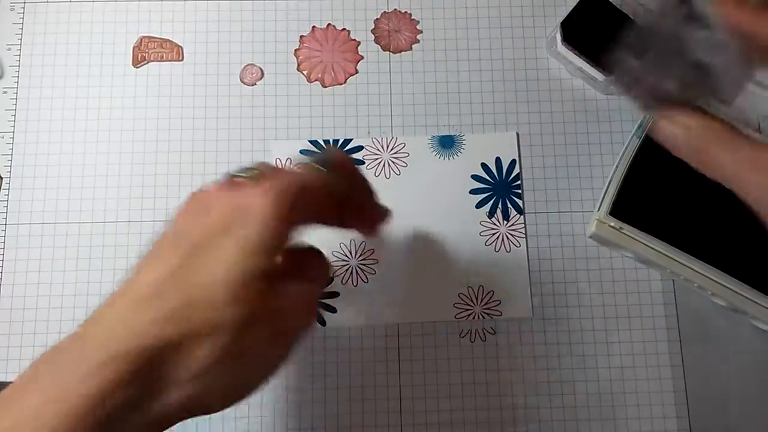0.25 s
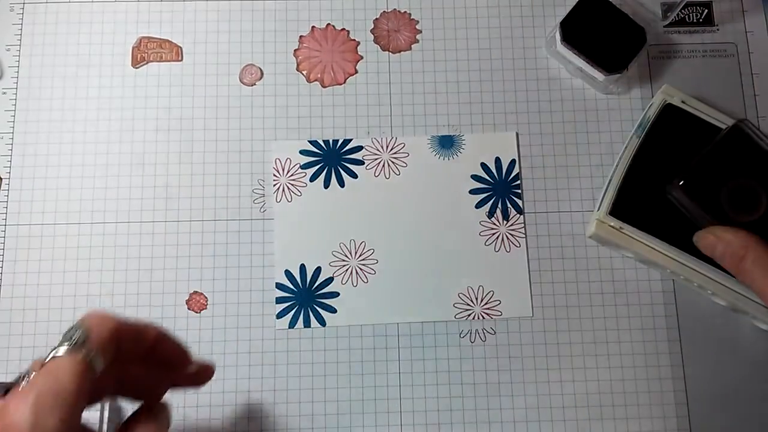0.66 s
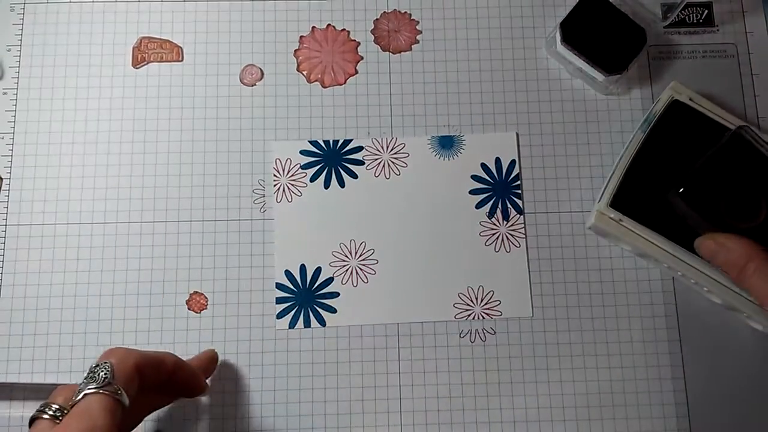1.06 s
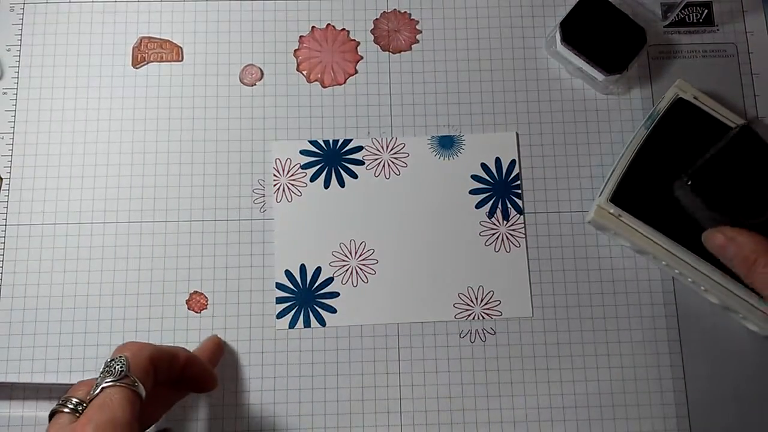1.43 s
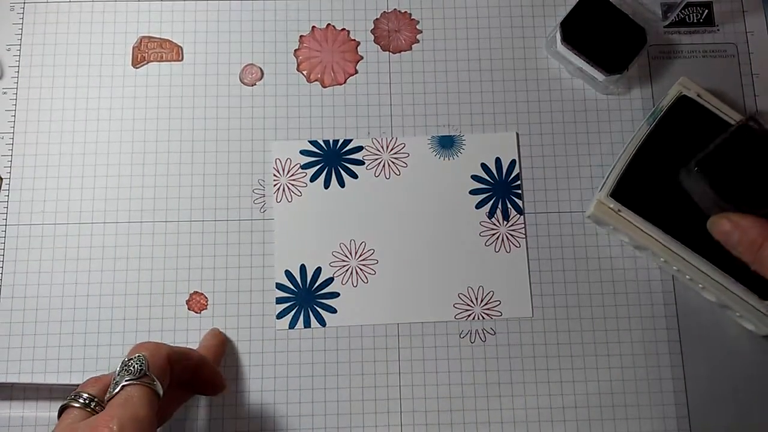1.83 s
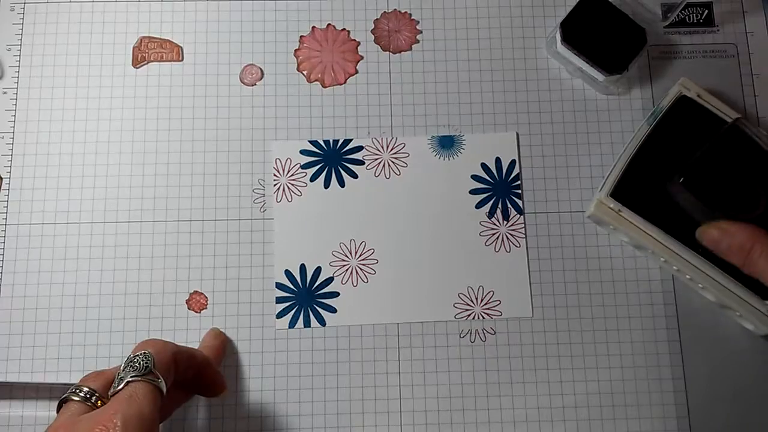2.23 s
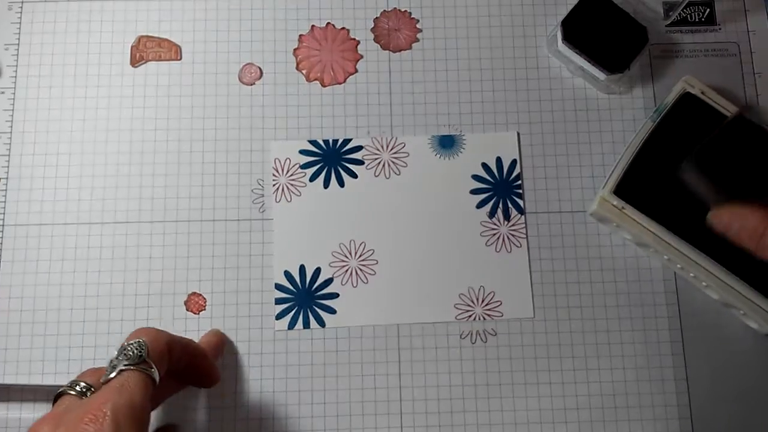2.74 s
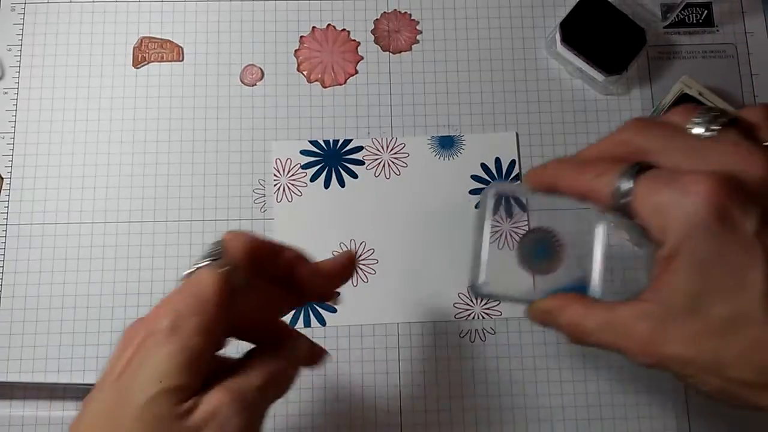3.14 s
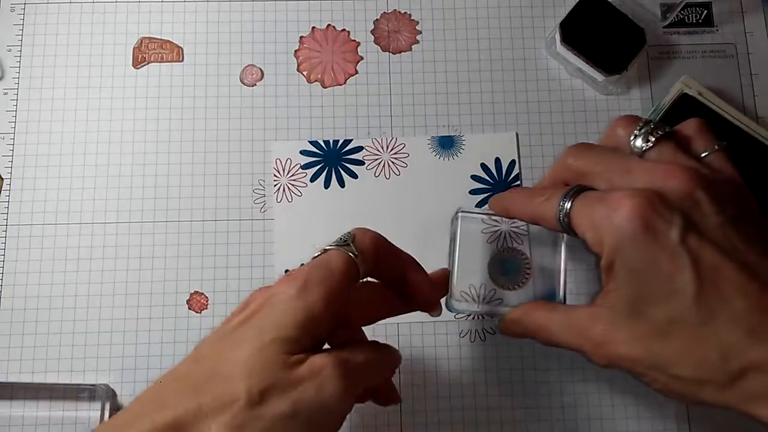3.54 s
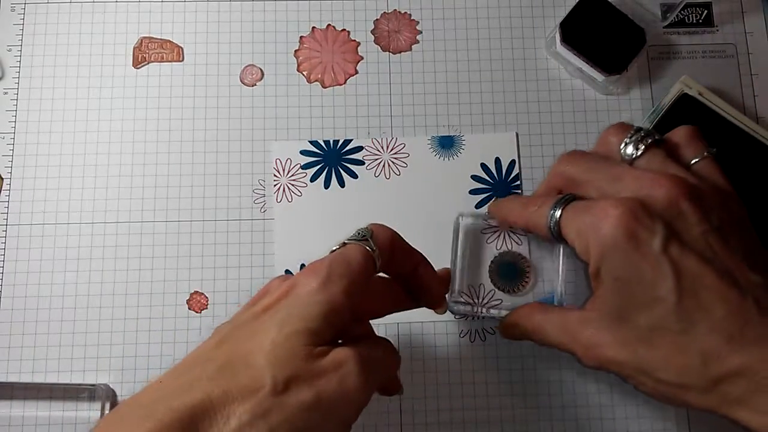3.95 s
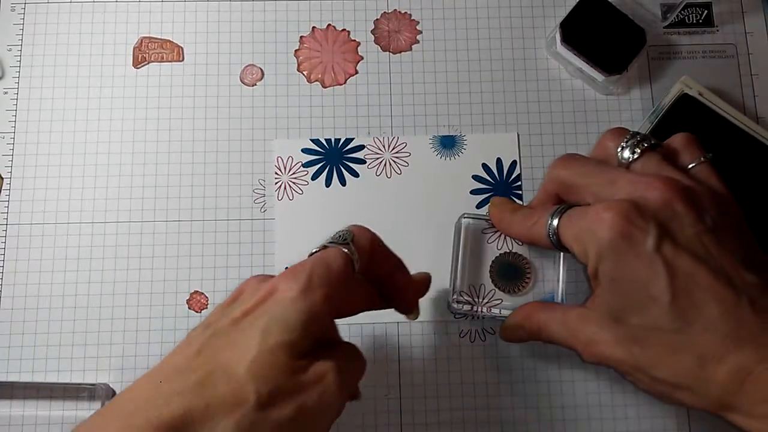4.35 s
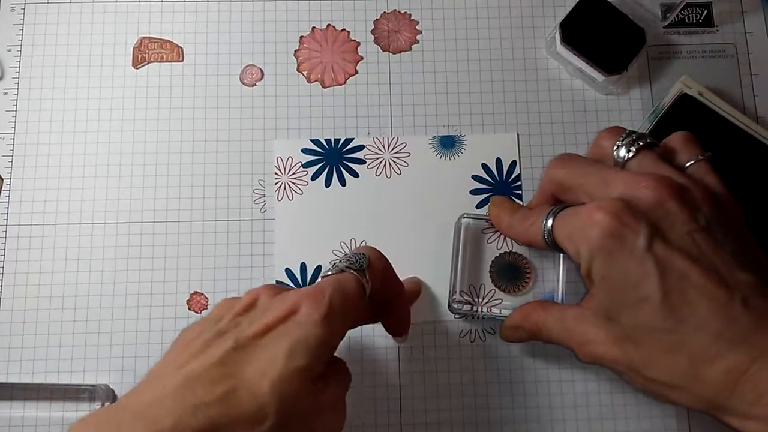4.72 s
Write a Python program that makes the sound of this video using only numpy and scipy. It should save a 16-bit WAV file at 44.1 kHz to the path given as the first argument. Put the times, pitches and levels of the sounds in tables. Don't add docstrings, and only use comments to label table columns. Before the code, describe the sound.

Faint ticks come first, then five evenly spaced hollow plastic taps with woody desk thumps. Between them the block peels from the sticky pad with little creaks and loose rattles, the early rattles brightest and loudest. A pause follows, then a single soft thud on card and tiny late ticks. Close desk microphone, short dry room, low mains hum and hiss that swells with the blows.

```python
import sys
import numpy as np
from scipy import signal
from scipy.fft import rfft, irfft
from scipy.io import wavfile
from scipy.ndimage import uniform_filter1d

SR = 44100
rng = np.random.default_rng(int(sys.argv[2]) if len(sys.argv) > 2 else 0)


def boost(x):
    u = np.asarray(x, float) / 20
    return 10 ** u


def master(y):
    cut = np.clip(np.atleast_2d(y).T, -1, 1)
    pcm = np.round(cut * 32767)
    wavfile.write(sys.argv[1], SR, pcm.astype(np.int16))


N = 219744
TIME = np.arange(N) / SR


def colour(x, table):
    hz, db = np.transpose(table)
    f = np.maximum(np.arange(len(x) // 2 + 1) * SR / len(x), 1)
    gain_db = np.interp(np.log(f), np.log(hz), db)
    return irfft(rfft(x) * boost(gain_db), len(x))


def add(out, start_s, x, peak_db):
    i = int(start_s * SR)
    n = min(len(x), N - i)
    out[i:i + n] += x[:n] * boost(peak_db) / np.abs(x).max()


def decay(t, t60):
    return np.exp(-np.log(1000) * t / t60)


def ring(modes, extra_db, detune, size):
    hz, db, t60 = np.transpose(modes)[:, :, None]
    t = np.arange(size) / SR
    return np.sum(boost(db + extra_db) * np.sin(2 * np.pi * hz * detune * t) * decay(t, t60), axis=0)


def push(ms):
    n = max(int(ms * SR / 1000), 2)
    return np.sin(np.pi * (np.arange(n) + .5) / n)


# start_s, case_db, knock_db, desk_top_db, frame_db
TAPS = [
    (0.585, -37.5, -30.5, -34, -31.5),
    (1.0266, -24.5, -33.5, -37.5, -31),
    (1.494, -25.5, -27.5, -36.5, -32),
    (1.991, -26.5, -24.5, -36.5, -33),
    (2.4786, -22, -22.5, -36.5, -34),
]
# delay_s, under_tap_db, crack_db, favour_db
REBOUNDS = [
    (.011, -18, -30, 18),
    (.033, -26.5, -22, 21.5),
]
# start_s, case_db, pitch_hz, creak_db, knock_db
SCUFFS = [
    (0.764, -60.5, 940, -53, -50.5),
    (1.222, -47.5, 1851, -60.5, -42.5),
    (1.677, -50, 1100, -61, -53),
    (2.224, -51, 1082, -57, -42),
    (2.696, -61, 920, -60, -62),
]
# start_s, creak_db, length_ms, pitch_hz, knock_db
CLINGS = [
    (0.842, -45.5, 44, 1218, -49),
    (1.285, -39, 39, 1105, -45.5),
    (1.76, -56.5, 22, 1263, -56),
    (2.261, -46, 13, 1190, -64),
    (2.739, -43, 18, 1110, -55.5),
]
# start_s, peak_db, crack_under_peak_db, favoured_pitch_hz, favour_db
CLATTER = [(0.862, -34, -23.5, 1300, 1.5), (0.8747, -15, -35, 1881, 34), (0.8809, -5, -8, 2525, 15),
           (0.887, -4, -7.5, 1420, 8), (0.898, -16.5, -7.5, 1710, 7.5), (0.907, -11, -20, 1450, 2.5),
           (1.309, -15, -25.5, 1150, 6), (1.317, -18.5, -17.5, 1900, 7), (1.328, -3.5, -7.5, 3300, 1),
           (1.332, -8.5, -8.5, 1120, 6.5), (1.3445, -3.5, -15.5, 1140, 8), (1.353, -20, -10, 1680, 9.5),
           (1.779, -31, -40, 1070, 2), (1.785, -22, -20, 1706, 5), (1.7897, -27, -24, 1044, 12),
           (2.276, -40, -53, 1010, 22), (2.2872, -15.5, -41, 1760, 5), (2.2933, -7, -15, 1190, 7),
           (2.301, -15, -20, 1640, -1.5), (2.308, -24, -5.5, 1710, -0.5), (2.754, -29.5, -19, 1003, 7),
           (2.7655, -12, -12.5, 1700, 18), (2.771, -14.5, -18.5, 1130, -1), (2.781, -23, -21, 1670, 9)]
# start_s, peak_db, crack_over_peak_db, pitch_hz, knock_db
STRAYS = [
    (0, -55.5, 23.5, 2660, -80),
    (0.05, -55, 8, 2730, -58),
    (0.205, -78.5, 14.5, 990, -76),
    (2.128, -60.5, 5, 1260, -72.5),
    (3.991, -45.5, 5, 750, -72),
    (4.001, -42.5, -7.5, 750, -68),
    (4.4, -74, 13, 790, -88),
    (4.895, -59.5, 1, 1330, -61),
    (4.91, -65, -2, 3350, -70),
]


def contacts():
    rows = []
    for s, db, crack_db, hz, favour_db in CLATTER:
        chatter_ms = 1.9 - 0.2871 * db
        rows.append((s, db, crack_db, hz, chatter_ms, favour_db))
    tap_hz, tap_ms = 1070, 3.8
    for s, db, knock_db, *_ in TAPS:
        tap_favour_db = 21 + 1.4 * (knock_db + 26)
        rows.append((s, db, -39.5, tap_hz, tap_ms, tap_favour_db))
        for late_s, under_db, crack_db, favour_db in REBOUNDS:
            rows.append((s + late_s, db + under_db, crack_db, tap_hz, tap_ms, favour_db))
    for s, db, hz, *_ in SCUFFS:
        rows.append((s, db, -14.5, hz, 2.4, 8.5))
    for s, db, _, hz, _ in CLINGS:
        for late_s, over_db in ((-.006, -4), (0, 1)):
            rows.append((s + late_s, db + over_db, -19.5, hz, 4.5, 10.5))
    for s, db, crack_db, hz, _ in STRAYS:
        rows.append((s, db, crack_db, hz, 6.6, 5))
    return rows


# pitch_hz, level_db, t60_s
CASE = [(947, -11, 0.051), (1058, -1.5, 0.018), (1150, 2, 0.03), (1300, -3.5, 0.02), (1420, -6, 0.04),
        (1686.6, 2.5, 0.028), (1840, -0.5, 0.026), (2014, -4.5, 0.02138), (2406, -6.5, .03),
        (2445, -7, 0.052), (2870, -8.5, .025), (3017, -10, 0.035), (3180, -6.5, 0.02), (3386, -4, 0.032),
        (3810, -13, 0.032), (4440, -19, 0.018), (4760, -17, 0.012)]
# pitch_hz, level_db
WALLS = [(500, -17), (800, -13.5), (1150, 4), (1700, -6), (2600, -0.5), (3500, -12), (5000, -8),
         (7000, -29)]
# pitch_hz, level_db
CRACK = [(2500, -10.5), (4000, 6), (6000, -3), (9600, -2), (10900, -17.5), (16000, -34)]
# pitch_hz, level_db
TICK = [(7000, -20.5), (10000, 0), (13000, -3), (16000, -17)]


def case():
    rung, rough, t = np.zeros(N), np.zeros(N), np.arange(4096) / SR
    mode_hz = np.array(CASE)[:, :1]
    for s, db, crack_db, favour_hz, ms, favour_db in contacts():
        chance = rng.standard_normal((2, len(CASE), 1))
        grit = rng.standard_normal((4, 4096))
        fade = np.exp(-t * 1000 / max(ms, .2)) * np.minimum(t / 0.0011, 1)
        chatter = .12 * grit[0] * boost(4.2 * grit[1]) * fade + (t == 0)
        soft_db = 0.2 * np.clip(-6.0 - crack_db, 0, 36)
        nearness = np.exp(-(np.log(mode_hz / favour_hz) / 0.091) ** 2)
        lean_db = 2 * chance[0] + favour_db * nearness
        lean_db = lean_db - soft_db * np.maximum(np.log2(mode_hz / 1500), 0)
        modes = ring(CASE, lean_db, 1 + 0.011 * chance[1], size=4096)
        add(rung, s, signal.fftconvolve(chatter, modes), db)
        rush = colour(colour(grit[3], WALLS), [(1500, 0.0052), (12000, -3 * soft_db)])
        rush = rush * np.minimum(t / 0.0015, 1) * np.exp(-t / 0.0055)
        add(rough, s, rush, db - 3.5 - 0.28 * favour_db)
        crack = colour(colour(grit[2], CRACK), [(5000, 0.0019), (16000, -.8 * soft_db)])
        add(rough, s, crack * fade * np.exp(-t / .006), db + crack_db)
        tick = colour(grit[1], TICK) * fade * np.exp(-t / .0012)
        add(rough, s, tick, db + crack_db - 16.5 - soft_db)
    return rung, rough


# start_s, knock_db, desk_top_db, frame_db
DROPS = [
    (0.8737, -30, -30, -41.5),
    (0.8855, -15.5, -68, -43),
    (1.31, -27.5, -32, -40.5),
    (1.3279, -13.5, -28, -36.5),
    (1.3445, -22.5, -34.5, -43),
    (1.785, -28, -34.5, -60),
    (2.2849, -32.5, -31.5, -45),
    (2.7505, -43.5, -44, -55),
    (2.7655, -20.5, -32, -43),
    (3.992, -19, -30, -34),
]


def blows():
    rows = list(DROPS)
    for s, _, *desk_db in TAPS:
        rows.append((s, *desk_db))
    for row in SCUFFS + CLINGS + STRAYS:
        knock_db = row[-1]
        rows.append((row[0] + 0.00067, knock_db, knock_db - 17, knock_db - 7.5))
    return rows


# pitch_hz, level_db, t60_s
HOLLOW = [(194, -16.5, 0.04), (279, -7.5, 0.098), (325, 0.5, 0.1), (359, 0, 0.084), (397.6, 2.5, 0.067),
          (378, -10, .06), (630, 5, 0.0095), (640, -10.5, 0.12)]
# pitch_hz, level_db, t60_s
CARD = [(196, -20.5, 0.13), (272.6, -0.5, 0.067), (311, 2, 0.046), (406, -18, 0.069), (531.5, -10.5, 0.079),
        (617, -7.5, 0.061), (747, -21, 0.077)]
# pitch_hz, level_db, t60_s
DESK = [(120.9, 8.5, .22), (143, -19.5, 0.07)]
# pitch_hz, level_db, t60_s
FRAME = [(59.2, -3, 0.37), (79, -7, 0.21)]
PRESS_S = 3.992


def desk():
    out, t = np.zeros(N), np.arange(8192) / SR
    swing = 1 - np.exp(-np.arange(16384) / SR / 0.0008)
    for s, knock_db, top_db, frame_db in blows():
        pressed = abs(s - PRESS_S) < .02
        modes, build_s, push_ms = (CARD, .004, .8) if pressed else (HOLLOW, .0015, 1.2)
        chance = rng.standard_normal((2, len(modes), 1))
        knock = ring(modes, 3.3 * chance[0], 1 + 0.013 * chance[1], size=8192)
        knock = knock * (1 - np.exp(-t / build_s))
        add(out, s, signal.fftconvolve(knock, push(push_ms)), knock_db)
        add(out, s + 0.00077, swing * ring(DESK, 0, 0.99, size=16384), top_db)
        add(out, s + 0.0039, swing * ring(FRAME, 0, 0.99, size=16384), frame_db)
    return out


# delay_s, length_ms, pitch_hz, level_db, overtone_db
SHIVERS = [
    (.0095, 6.5, 2385, -50.5, -30),
    (.027, 19, 1024, -49, -20),
]
# delay_s, length_ms, pitch_hz, under_knock_db, overtone_db
RING = (.0005, 7, 1035, -8, -30)
# start_s, length_ms, pitch_hz, level_db, overtone_db
SETTLE = [
    (1.374, 12, 1019, -37, -33),
]


def strains():
    rows, shiver_rough = [], 0.29
    ring_late_s, ring_ms, ring_hz, under_db, ring_over_db = RING
    for s, tap_db, knock_db, *_ in TAPS:
        for late_s, ms, hz, db, over_db in SHIVERS:
            rows.append((s + late_s, ms, hz, db + tap_db + 22.5, over_db, shiver_rough))
        rows.append((s + ring_late_s, ring_ms, ring_hz, knock_db + under_db, ring_over_db, shiver_rough))
    for s, db, ms, hz, _ in CLINGS:
        rows.append((s, ms, hz, db, -14, .8))
    for s, _, hz, db, _ in SCUFFS:
        rows.append((s - .002, 14, hz, db, -16, 0.74))
    for row in SETTLE:
        rows.append((*row, shiver_rough))
    return rows


def creaks():
    out, t = np.zeros(N), np.arange(2048) / SR
    for s, ms, hz, db, over_db, rough in strains():
        drift = uniform_filter1d(rng.standard_normal((3, 2048)), 90, axis=1) * 6.0
        phase = 2 * np.pi * np.cumsum(hz * (1 + .12 * rough * drift[0])) / SR
        swell = np.minimum(t / .002, 1) * np.exp(-np.maximum(t - ms / 1000, 0) / 0.0036)
        tone = boost(4.0 * rough * drift[1]) * np.sin(phase)
        overtone = boost(over_db + 14 * rough * drift[2]) * np.sin(2.15 * phase)
        add(out, s, swell * (tone + overtone), db)
    return out


# pitch_hz, level_db, t60_s
ROOM = [(150, -13.5, 0.39), (397, -14, 0.19), (770, -25, 0.2), (1819.4, -23.5, 0.17), (3975, -24, .18),
        (8000, -21.5, 0.12)]


def room(x):
    t, tail = np.arange(16384) / SR, 0
    for hz, db, t60 in ROOM:
        octave = [(hz / 3, -30), (hz / 1.3, 0), (hz * 1.3, 0), (hz * 3, -30)]
        band = colour(rng.standard_normal(len(t)), octave)
        tail = tail + boost(db) * band / band.std() * decay(t, t60) * np.sqrt(hz / 1000)
    tail = signal.sosfilt(signal.butter(4, 170, "high", fs=SR, output="sos"), tail)
    return signal.fftconvolve(x, 0.036 * tail * np.minimum(t / 0.0031, 1))[:N]


# start_s, end_s, first_opening_db, last_opening_db
GATE_OPEN = [
    (0, .09, 13.5, 6),
    (.09, 0.187, 2.5, 6),
    (.6, 2.205, 7.5, 10),
    (2.28, 2.6, 6.5, 10),
    (2.75, 2.95, 10, 9),
    (3.99, 4.22, 10.5, 6.5),
]


def gate():
    slew_s, ajar_db, shuts_s = .022, 1.5, .25
    open_db = np.zeros(N)
    for start, end, first_db, last_db in GATE_OPEN:
        sliding = np.interp(TIME, [start, end], [first_db, last_db])
        closing = ajar_db * np.exp(-np.maximum(TIME - end, 0) / shuts_s)
        since_start = np.where(TIME < end, sliding, closing)
        open_db = np.where(TIME < start, open_db, since_start)
    return uniform_filter1d(open_db, int(slew_s * SR), mode="nearest")


# pitch_hz, level_db (per Hz)
AIR = [(15, -49), (25, -26), (45, -7), (75, -8.5), (105, -19.5), (200, -23.5), (1000, -33.5),
       (16000, -40.5)]
# pitch_hz, level_db
HUM = [(59.2, -69.5), (177.6, -82.5), (296.1, -90), (414.5, -85), (532.9, -95)]
# pitch_hz, level_db
PASSED = [(1000, 1.5), (3000, 0), (4800, 2), (6600, -4), (9200, 1), (11500, -3.5), (16000, -2)]


def background():
    air = colour(rng.standard_normal(N), AIR)
    treble = colour(air, [(5900, -80), (6000, 0), (15000, 0), (15100, -80)])
    air = air * boost(-79.5) / treble.std()
    for hz, db in HUM:
        waver = uniform_filter1d(rng.standard_normal(N), 3000) * 9
        air = air + np.sqrt(2) * boost(db) * (1 + waver) * np.sin(2 * np.pi * hz * TIME)
    bass = colour(air, [(90, -5), (250, -33.0)])
    open_db = gate()
    drift = uniform_filter1d(rng.standard_normal(N), size=2000)
    drift_db = 0.2 * drift / drift.std()
    passed = colour(air - bass, PASSED) * (boost(open_db) - 1) * boost(drift_db)
    return bass * boost(.5 * open_db) + air - bass + passed


def scene():
    rung, rough = case()
    clear = rung + desk()
    answer = room(boost(-6.5) * clear + boost(1.5) * rough)
    hits = clear + rough + creaks() + answer
    hits = signal.sosfilt(signal.butter(4, 50, "high", fs=SR, output="sos"), hits)
    return (hits + background())[None]


def band_limit(x):
    return signal.sosfilt(signal.butter(12, 16500, fs=SR, output="sos"), x)


def record(dry):
    cut = signal.sosfilt(signal.butter(2, 36, "high", fs=SR, output="sos"), dry)
    cut = signal.sosfilt(signal.ellip(8, .2, 60, 15850, fs=SR, output="sos"), cut)
    return band_limit(cut)


dry = scene()
out = record(dry)
master(out)
```